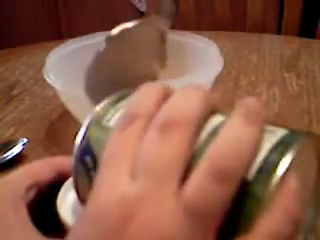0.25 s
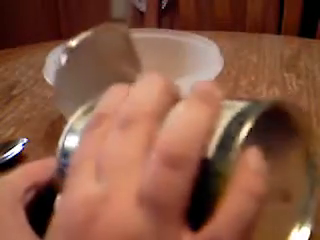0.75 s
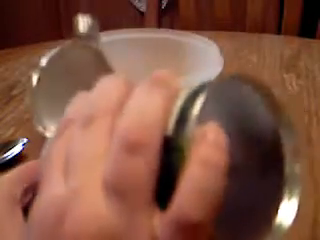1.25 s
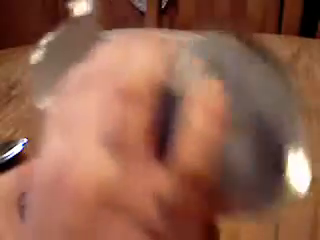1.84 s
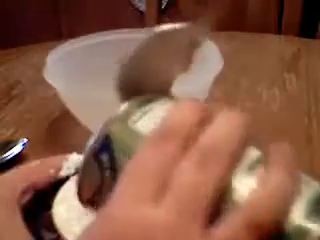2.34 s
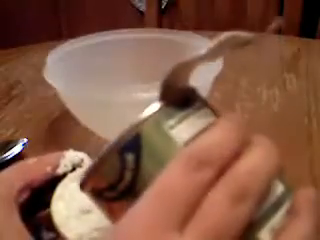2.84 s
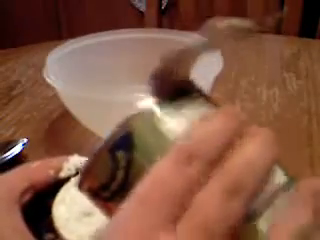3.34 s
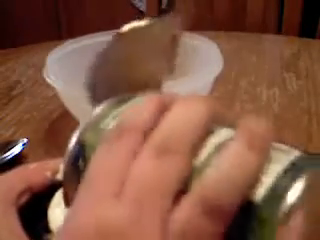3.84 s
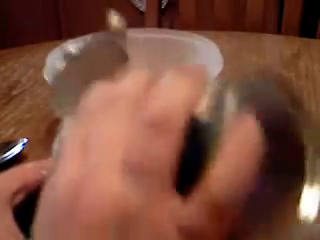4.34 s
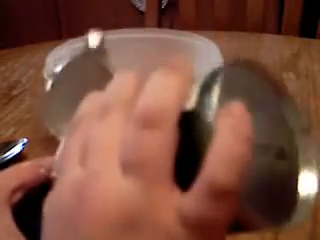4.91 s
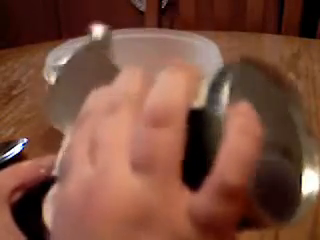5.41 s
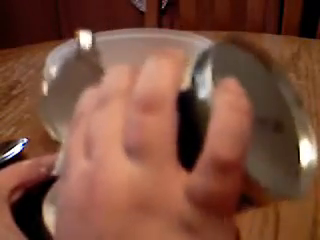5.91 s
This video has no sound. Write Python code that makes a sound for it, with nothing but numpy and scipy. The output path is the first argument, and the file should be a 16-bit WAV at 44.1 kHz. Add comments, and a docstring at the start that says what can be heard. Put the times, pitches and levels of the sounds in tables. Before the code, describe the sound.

Dull knocks and occasional clacks on a tipped metal can, quickening near the end, in a kitchen with steady hum and hiss.

```python
"""Dull thuds and a few clacks: a tin can of powder, tipped over a bowl, is knocked again and again.
Each knock rings one panel and the damped body; hard contact lets the steel clack through.
Kitchen table, cupboards and walls throw each knock back.
An appliance hums under the steady hiss and faint whine of a small camera close by."""
import sys
import numpy as np
from scipy import signal
from scipy.fft import rfft, irfft, next_fast_len
from scipy.io import wavfile
from scipy.ndimage import map_coordinates

SR = 44100
rng = np.random.default_rng(int(sys.argv[2]) if len(sys.argv) > 2 else 0)


def unload_audio(sound):
    """Save the sound as a 16-bit wav file, at the path given as the first command line argument."""
    columns = np.transpose(np.atleast_2d(sound))
    # keep every value between -1 and 1, then stretch to whole-number steps
    steps = np.round(np.clip(columns, -1, 1) * 32767)
    wavfile.write(sys.argv[1], SR, steps.astype(np.int16))


N = 272097

# room air spectrum: f/Hz, relative density/dB
AIR_SPECTRUM = [(25, -12), (45, -13), (62, 4.5), (80, -9), (105, -7), (140, -1.5), (200, 0), (300, -0.5),
                (450, -5), (800, -6), (1250, -9), (1500, -9.5)]
# microphone hiss spectrum: f/Hz, relative density/dB
HISS_SPECTRUM = [(1500, -2.5), (2000, 1.5), (2600, -3), (3050, -2.5), (3500, -5.5), (5000, -9),
                 (6500, -9.5), (7900, -12), (8650, -9.5), (9300, -13.5), (12400, -15)]
# camera electronics: f/Hz, rms level/dB
WHINE_TONES = [(2939, -61), (3898, -63), (5243, -76), (5512, -73), (5857, -67), (6433, -56), (6821, -60),
               (7348, -68), (8403, -74), (9760, -72), (9986, -72), (12064, -76)]
# mains and motor: f/Hz, rms level/dB, unsteady power share/0-1, width/Hz
HUM_TONES = [(59.1, -47.5, 0.05, 4.82), (65.9, -51, 1, 12), (120.5, -36, 0.03, 2.74), (208.8, -37, 0.3, 12),
             (242, -42, 0.78, 9), (245, -44.5, 1, 9.7), (414, -50.5, 0.42, 6), (1066, -54, 1, 11),
             (1167, -53, 1, 28), (1213, -52.5, 0.96, 25)]
# first echoes off table, cupboards, walls: delay/s, level/dB
EARLY_ECHOES = [(.0042, -0.7), (.00887, -9.5), (0.0114, -5), (0.0138, -3.5), (0.0208, -3.5),
                (0.0277, -10.5)]
# standing waves: f/Hz, gain at resonance/dB, t60/s
ROOM_MODES = [(101.7, 4.5, 0.082), (129.9, 2, 0.91), (169.1, -0.5, 0.48), (233.8, 15.5, 0.34),
              (306.1, 13.5, 0.19)]
# diffuse decay: f/Hz, t60/s
TAIL_DECAY = [(150, 0.73), (500, 0.32), (1200, 0.3), (3000, 0.36), (10000, 0.18)]
# can body, damped by hand and powder: f/Hz, relative level/dB, base t60/s
BODY_MODES = [(317, -3, 0.042), (467, -4.5, 0.022), (538.6, -21.5, 0.13)]
# higher modes of the steel shell: f/Hz, relative level/dB, base t60/s
STEEL_MODES = [(650, -7.5, 0.031), (752, -7, 0.022), (870, -6.5, 0.053), (1057, -4, 0.06),
               (1193, -18.5, 0.16), (1290, -20, 0.28), (1900, -30, 0.022)]
# contact noise spectrum: f/Hz, relative density/dB
CLACK_SPECTRUM = [(100, -21), (200, -7), (400, 2), (700, 1), (900, 12.5), (1250, -22), (1500, -8),
                  (2000, 5.5), (2700, -46), (12000, -32)]
# dull thuds, all struck alike: t/s, strength/dB, panel f/Hz
THUD_KNOCKS = [(2.1633, -2.5, 166), (4.3297, -3, 178), (5.1463, -5, 178.5), (5.383, -4, 175.6),
               (5.5852, -3, 175), (5.804, -2.3, 174), (6.062, -5, 172)]
# hard clacks and light touches, each on another spot: t/s, panel f/Hz, panel t60/s,
# panel drive/dB, body drive/dB, steel drive/dB, contact cutoff/Hz, steel's freedom to ring/0-1
CLACK_KNOCKS = [(0.554, 178, 0.072, -25, -31, -26, 800, 0.7),
                (1.6162, 240, 0.11, -24.5, -6, -11.5, 1800, 0.92),
                (1.824, 240, 0.032, -39, -36, -23, 905, 0.5),
                (3.0575, 873, 0.037, -15.5, -21.5, -10, 1770, 0.3)]


def amp(db):
    """dB to gain."""
    return 10 ** (np.asarray(db) / 20)


def unit(x):
    """Scale to rms 1."""
    return x / np.sqrt(np.mean(np.abs(x) ** 2) + 1e-20)


def along(points, hz):
    """Interpolate (f/Hz, value) points on a log axis."""
    f, v = np.transpose(points)
    return np.interp(np.log(hz + 1), np.log(f + 1), v)


def filtered(x, response):
    """Apply the gain response(f/Hz)."""
    m = next_fast_len(len(x) + SR // 4)
    return irfft(rfft(x, m) * response(np.fft.rfftfreq(m, 1 / SR)), m)[:len(x)]


def low_cut(x, hz):
    """Second-order high-pass."""
    return signal.sosfilt(signal.butter(2, hz, "highpass", fs=SR, output="sos"), x)


def noise(spectrum, size):
    """Coloured noise, rms 1."""
    return unit(filtered(rng.standard_normal(size), lambda hz: amp(along(spectrum, hz))))


def wobble(rate_hz):
    """Smooth random curve, rate_hz knots a second."""
    position = np.arange(N) * rate_hz / SR + 2
    return map_coordinates(rng.standard_normal(N // 100), [position], mode="mirror")


def fade(t, t60_s):
    """Decay by 60 dB in t60_s."""
    return np.exp(-np.log(1000) * t / t60_s)


def ring(t, hz, t60_s):
    """One struck mode; first swing is away from the listener."""
    return -np.sin(2 * np.pi * hz * t) * fade(t, t60_s)


def air_and_hiss(air_db=-35.5, hiss_db=-43.0, cross_hz=1500, flicker_db=0.52):
    """Room air below the crossover, slightly flickering microphone hiss above."""
    low_share = lambda hz: 1 / (1 + (hz / cross_hz) ** 16)
    air = unit(filtered(noise(AIR_SPECTRUM, N), lambda hz: np.sqrt(low_share(hz))))
    hiss = unit(filtered(noise(HISS_SPECTRUM, N), lambda hz: np.sqrt(1 - low_share(hz))))
    return amp(air_db) * air + amp(hiss_db + flicker_db * wobble(40)) * hiss


def camera_whine(jitter_rad=1.1, jitter_hz=8.8):
    """Thin tones of the electronics, wandering in phase."""
    t = np.arange(N) / SR
    return sum(amp(db) * unit(np.sin(2 * np.pi * hz * t + jitter_rad * wobble(jitter_hz)))
               for hz, db in WHINE_TONES)


def appliance():
    """Steady mains hum and wavering motor tones."""
    t, out = np.arange(N) / SR, np.zeros(N)
    for hz, db, share, width_hz in HUM_TONES:
        drift = unit(wobble(width_hz) + 1j * wobble(width_hz))
        sway = np.sqrt(1 - share) + np.sqrt(share) * drift
        carrier = np.exp(2j * np.pi * (hz * t + rng.random()))
        out += amp(db) * unit(np.real(sway * carrier))
    return out


def flutter_echoes(count=7, start_s=0.0338, step_s=0.00785, first_db=-15.5, rise_db=0.3):
    """Bounces between facing surfaces, each slightly louder: delay/s, level/dB."""
    return [(start_s + k * step_s, first_db + k * rise_db) for k in range(count)]


def diffuse_tail(t, build_s=0.03, cut_hz=500):
    """Dense reflections build and decay; the bass has too few modes to be diffuse."""
    hz, frames_s, spectra = signal.stft(rng.standard_normal(len(t)), SR, nperseg=256)
    decay = fade(frames_s, along(TAIL_DECAY, hz)[:, None])
    tail = signal.istft(spectra * decay, SR, nperseg=256)[1][:len(t)]
    tail *= 1 - np.exp(-t / build_s)
    return low_cut(tail / np.linalg.norm(tail), cut_hz)


def kitchen(x, tail_db=-3.0, blur_per_delay=0.0079):
    """Direct sound, echoes, standing waves and diffuse tail."""
    t = np.arange(SR // 2) / SR
    response = np.zeros(len(t))
    response[0] = 1
    for delay_s, db in EARLY_ECHOES + flutter_echoes():
        blur_s = blur_per_delay * delay_s + 1 / SR  # longer path, duller echo
        echo = np.exp(-0.5 * ((t - delay_s) / blur_s) ** 2)
        response += amp(db) * echo / echo.sum()
    for hz, db, t60_s in ROOM_MODES:
        unity_peak = 2 * np.log(1000) / (t60_s * SR)
        response += amp(db) * unity_peak * ring(t, hz, t60_s)
    return signal.fftconvolve(x, response + amp(tail_db) * diffuse_tail(t))[:N]


def struck(t, modes, t60_scale, scatter_db=1.0):
    """Modes rung together; levels scatter from knock to knock."""
    return sum(amp(db + rng.normal(0, scatter_db)) * ring(t, hz, t60_s * t60_scale)
               for hz, db, t60_s in modes)


def thuds(t60_s=0.058, body_db=-7, steel_db=-8.5, freedom=0.48, base_cutoff_hz=1130, harder_per_db=0.12):
    """Stronger thud: louder, harder contact. Columns as in CLACK_KNOCKS."""
    return [(at_s, hz, t60_s, db, db + body_db, db + steel_db,
             base_cutoff_hz * np.exp(harder_per_db * db), freedom) for at_s, db, hz in THUD_KNOCKS]


def can(clack_db=-12, clack_t60_s=0.031, tick_db=-34, tick_t60_s=0.011):
    """Each knock rings panel, body and shell; harder contact passes more of the steel's clack."""
    out, t = np.zeros(N + SR), np.arange(SR // 2) / SR
    for at_s, panel_hz, t60_s, panel_db, body_db, steel_db, cutoff_hz, freedom in thuds() + CLACK_KNOCKS:
        panel = amp(panel_db) * ring(t, panel_hz, t60_s)
        body = amp(body_db) * struck(t, BODY_MODES, t60_scale=0.89)
        shell = struck(t, STEEL_MODES, t60_scale=freedom)
        clack = amp(clack_db) * noise(CLACK_SPECTRUM, len(t)) * fade(t, clack_t60_s)
        steel = amp(steel_db) * (shell + clack)
        contact = signal.butter(3, cutoff_hz, fs=SR, output="sos")
        # faint bare-metal tick, muted by a firm grip
        tick = amp(steel_db + tick_db) * freedom ** 2 * rng.standard_normal(len(t)) * fade(t, tick_t60_s)
        out[round(at_s * SR):][:len(t)] += signal.sosfilt(contact, panel + body + steel) + tick
    return out[:N]


def scene():
    """Knocks in the kitchen over hum, hiss and whine; mono."""
    knocks = low_cut(can(), hz=78.5)  # the knocks are cut below about 80 Hz
    return (kitchen(knocks) + appliance() + air_and_hiss() + camera_whine())[None]


def record(dry):
    """The camera's band limit."""
    top_hz = 12680
    return np.array([filtered(channel, lambda hz: hz < top_hz) for channel in dry])


dry = scene()
out = record(dry)
unload_audio(out)
```